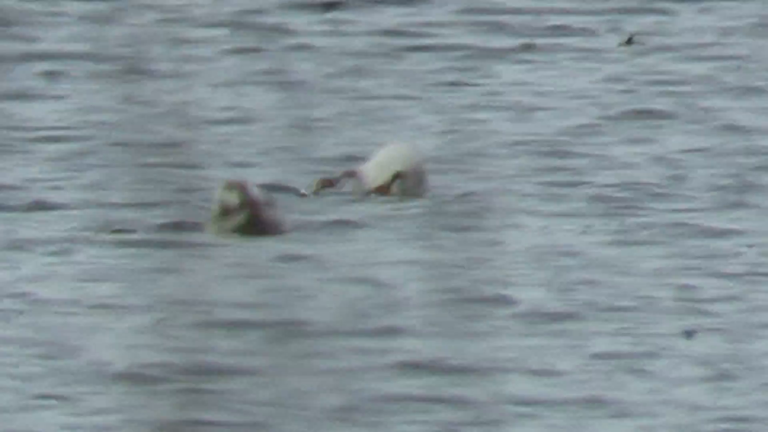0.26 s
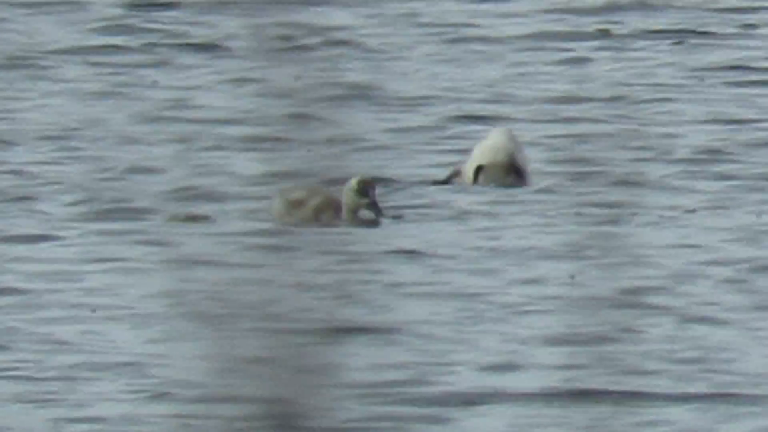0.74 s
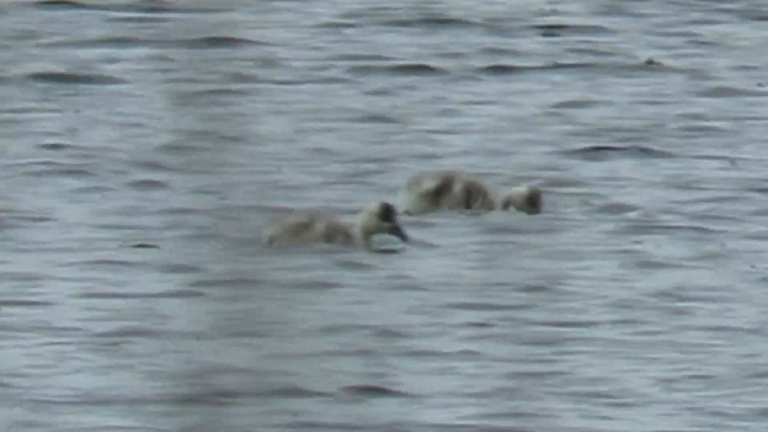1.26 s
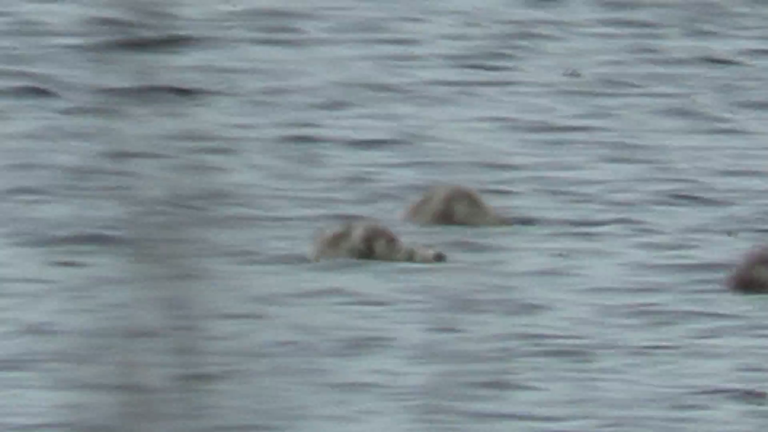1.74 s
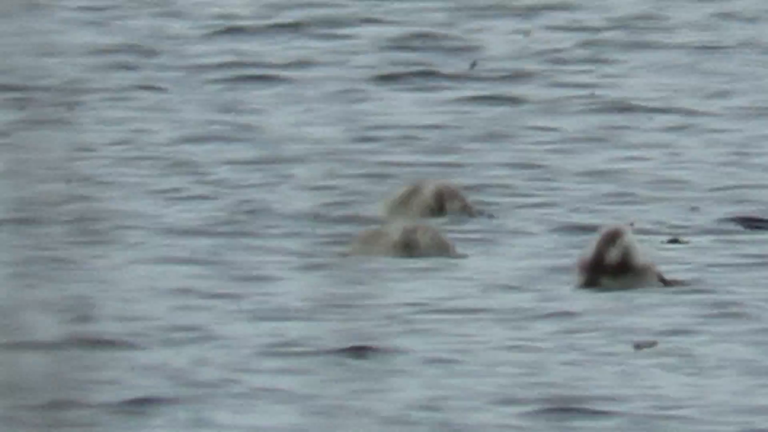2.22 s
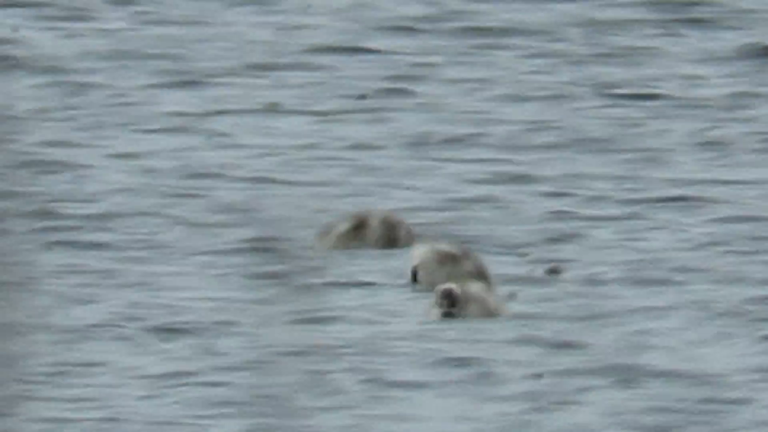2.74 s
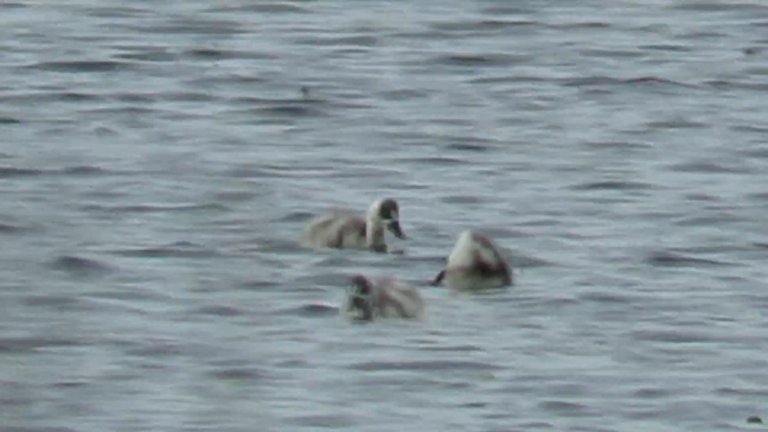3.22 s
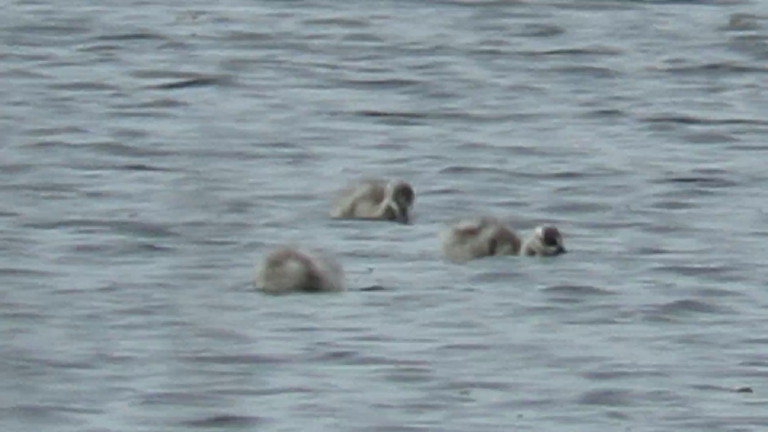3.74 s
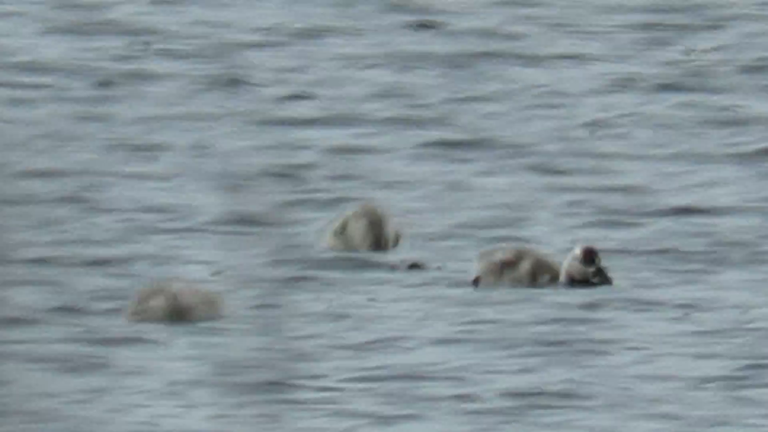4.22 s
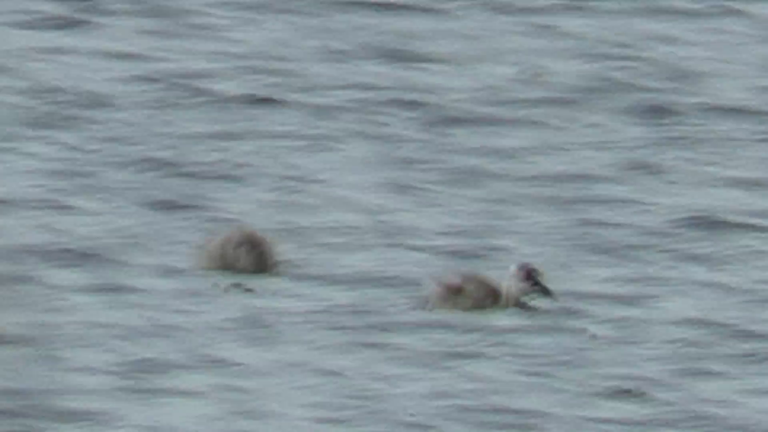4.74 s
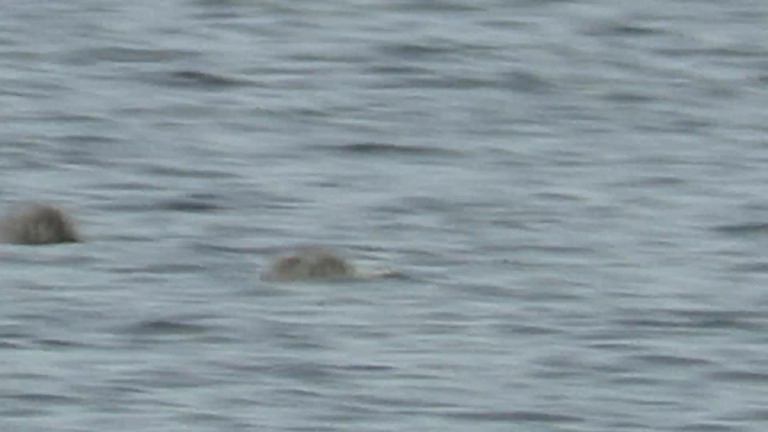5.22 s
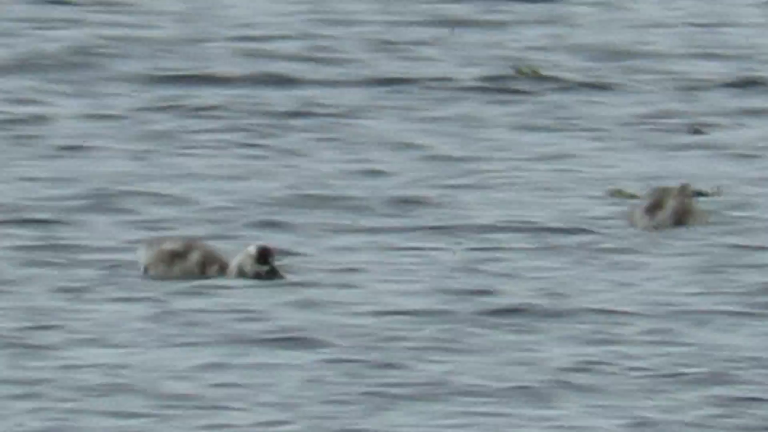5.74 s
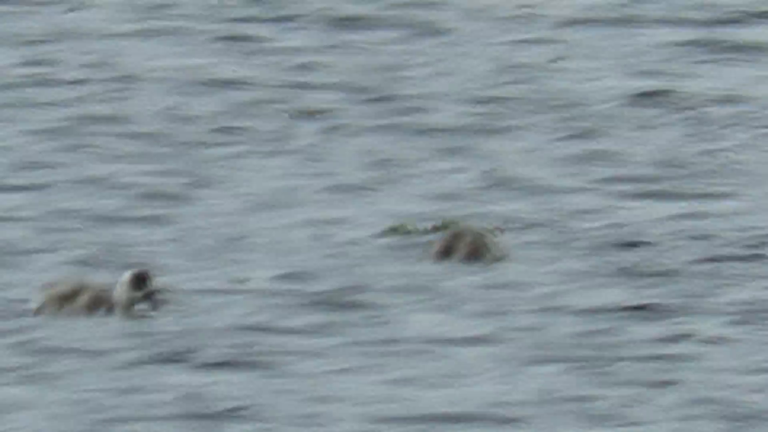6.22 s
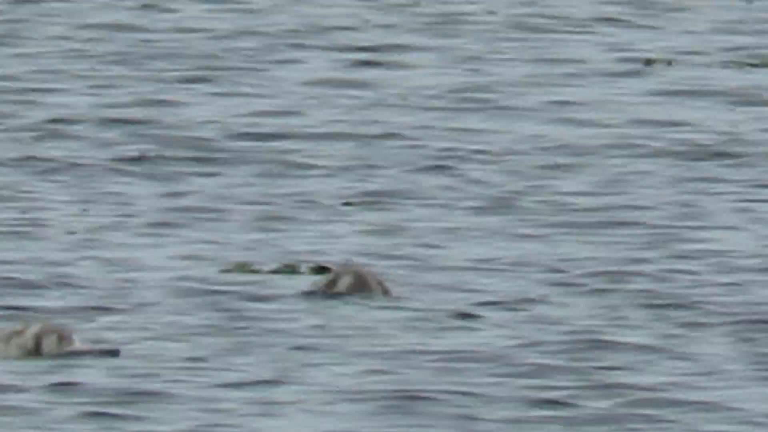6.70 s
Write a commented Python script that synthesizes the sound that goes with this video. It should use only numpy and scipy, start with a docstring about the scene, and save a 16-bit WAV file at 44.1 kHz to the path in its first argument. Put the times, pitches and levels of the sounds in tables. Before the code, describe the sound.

A swan calls a rapid run of short, nasal repeated notes across open water, echoing faintly, while wind rumbles on the microphone.

```python
"""A swan calls a long run of short clear notes across open water: steady partials weighted by the throat, plus breath.
Reeds smear each note, the far shore returns it, and a cove scatters what the beak throws sideways (random taps).
Small birds peep and other fowl hoot far off (arching tones); the camera body knocks and ticks (brief rings).
Wind rumbles on a two-port microphone over the wash of the lake (shaped noise), with two faint narrow bands
in the background, perhaps a microphone resonance and a motor hum (narrow noise)."""
import sys
import numpy as np
from scipy import signal
from scipy.fft import rfft, irfft
from scipy.io import wavfile
from scipy.ndimage import uniform_filter1d

SR = 44100
rng = np.random.default_rng(int(sys.argv[2]) if len(sys.argv) > 2 else 0)


def transcribe(signal):
    """Save signal, clipped to [-1, 1], as a 16-bit WAV file at the path in sys.argv[1]."""
    frames = np.atleast_2d(signal).T
    limited = np.clip(frames, -1, 1)
    pcm = np.round(limited * 32767).astype(np.int16)
    wavfile.write(sys.argv[1], SR, pcm)


N = 307377  # samples in the scene


def gain_of(db):
    """Decibels to an amplitude factor."""
    return 10 ** (np.asarray(db) / 20)


def evened(x):
    """Scales a sound to rms 1."""
    return x / np.sqrt(np.mean(x ** 2) + 1e-20)


def read(points, hz, column=1):
    """Joins one column of a spectrum table on a log-frequency axis."""
    table = np.transpose(points)
    return np.interp(np.log(hz + 1), np.log(table[0] + 1), table[column])


def add(mix, start_s, sound):
    """Lays a sound into the mix, cut off at the end of the mix."""
    part = mix[round(start_s * SR):][:len(sound)]
    part += sound[:len(part)]


def drift(count, size):
    """Slow chance of rms 1, noise smoothed twice over size samples."""
    smooth = uniform_filter1d(rng.standard_normal(count), size=size)
    return evened(uniform_filter1d(smooth, size=size))


def tilt(table, hz):
    """Half the lead and balance of a port table, to multiply the left and divide the right."""
    half_balance = gain_of(read(table, hz, column=3) / 2)
    half_lead = np.exp(.5j * read(table, hz, column=2))
    return half_balance * half_lead


def ports(x, table):
    """A sound from one direction reaches the two ports with its own lead and balance."""
    half = tilt(table, np.fft.rfftfreq(N, 1 / SR))
    return irfft(rfft(x) * np.array([half, 1 / half]), N)


def noise(colour_db, table, patchy_db, size=2048):
    """Random short-time spectra with drifting patches, partly shared by the ports; rms 1."""
    frames, hz = N * 4 // size + 5, np.fft.rfftfreq(size, 1 / SR)
    a, b, c, d, patches = rng.standard_normal((frames, len(hz), 5)).T
    patches = uniform_filter1d(patches, size=14, axis=0)  # across frequency
    patches = evened(uniform_filter1d(patches, size=8, axis=1))  # across time
    likeness = np.clip(read(table, hz), 0, 1)[:, None]
    half = tilt(table, hz)[:, None]
    left = a + 1j * b
    right = likeness * left + np.sqrt(1 - likeness ** 2) * (c + 1j * d)
    spectra = np.array([left * half, right / half])
    spectra *= gain_of(colour_db(hz)[:, None] + patchy_db * patches)
    return evened(signal.istft(spectra, nperseg=size, noverlap=size * 3 // 4)[1][:, :N])


# The two ports for sound through air: pitch_hz, likeness_0_to_1, left_lead_rad, left_minus_right_db
AIR_PORTS = [(60, 1, -1.5, -1), (134, 1, -0.5, 0), (297, 1, -0.2, 0.5), (464, 0.52, 0.1, -1.5),
             (780, 0.52, -0.28, 0.5), (1110, 0.83, 0.2, 0), (1610, 0.38, 0, 0.9), (2160, 0.56, 1.5, 2.5),
             (3590, 0, 2.18, 1.5), (4300, 0.34, 4.5, 0), (4380, 0.24, 3, 0.5), (8240, 0.14, 2.5, 0),
             (13300, 0.9, 4.5, 0)]
# Faint narrow bands in the background: centre_hz, width_hz, level_db
FAINT_BANDS = [(794.8, 19, -55.5), (1036, 8.7, -61)]


def faint_bands():
    """Two narrow bands of noise, perhaps a microphone resonance and a motor hum."""
    out = np.zeros((2, N))
    for centre_hz, width_hz, level_db in FAINT_BANDS:
        band = lambda hz: -20 * np.log10(1 + ((hz - centre_hz) / (width_hz / 2)) ** 2)
        out += gain_of(level_db) * noise(band, AIR_PORTS, patchy_db=1.0, size=4096)
    return out


# Colour of the lake's wash: pitch_hz, density_db (per Hz, relative)
WASH_COLOUR = [(25, -44), (50, -6), (80, 2), (130, -2.5), (200, -4.5), (300, -4), (500, -8), (800, -8.5),
               (1060, -11.5), (1370, -16.5), (2100, -23.5), (2900, -27), (9300, -42), (11500, -47.5),
               (14100, -62.5)]
WASH_DB = -42


def lake():
    """Wide wash of wavelets and air."""
    return gain_of(WASH_DB) * noise(lambda hz: read(WASH_COLOUR, hz), AIR_PORTS, patchy_db=1.55)


# Strength of the wind over time: time_s, rumble_db
GUST_LEVELS = [(0.0, -54), (0.13, -48.5), (0.7, -58.5), (0.85, -42.5), (0.99, -67), (1.01, -54.5),
               (1.5, -65), (1.9, -55), (2.17, -44.5), (2.25, -51.5), (2.75, -42), (2.87, -44), (3.8, -41),
               (3.82, -36), (3.92, -43), (4.15, -36), (4.45, -38.5), (4.56, -46), (5.07, -42.5),
               (5.15, -51), (5.2, -36.5), (5.27, -43.5), (5.38, -41), (5.61, -46.5), (6.27, -43.5),
               (6.37, -39.5), (6.46, -44), (6.72, -40.5), (6.89, -31), (6.97, -41)]
# Colour of the rumble: pitch_hz, density_db (per Hz, relative)
RUMBLE_COLOUR = [(22, -27), (35, -6.5), (50, -2), (72, 3), (110, -2.5), (160, -3.5), (250, -11.5),
                 (420, -18), (600, -42), (1200, -110)]
# Colour of the deeper thump: pitch_hz, density_db (per Hz, relative)
THUMP_COLOUR = [(12, -55), (26, -16), (35, 20), (50, 22), (70, -46), (140, -110)]
# Gusts sweeping across the ports: pitch_hz, likeness_0_to_1, left_lead_rad, left_minus_right_db
GUST_PORTS = [(30, 0.8, -0.5, -1), (48, 0.85, 0.5, 7), (66, 0.92, -.5, -0.5), (98.6, 0.77, -0.24, 5.5),
              (132, 0, -2, -7), (170, 0, -3.5, 2), (222, 0.65, -2.5, -9), (450, 1, -2, -1.5)]
LUMPS_DB, THUMP_LUMPS_DB = 1, 7.5  # chance lumps in rumble and thump
THUMP_DB, THUMP_SHARE = -61, 0.76  # the thump follows the gusts in part


def wind():
    """Gusts on the ports: a lumpy rumble and a deeper thump."""
    gust_db = np.interp(np.arange(N) / SR, *np.transpose(GUST_LEVELS))
    rumble = noise(lambda hz: read(RUMBLE_COLOUR, hz), GUST_PORTS, patchy_db=0.0, size=4096)
    thump = noise(lambda hz: read(THUMP_COLOUR, hz), GUST_PORTS, patchy_db=0.5, size=4096)
    rumble_db = gust_db + LUMPS_DB * drift(N, size=2500)
    thump_db = THUMP_DB + THUMP_SHARE * (gust_db - gust_db.mean()) + THUMP_LUMPS_DB * drift(N, size=2500)
    return gain_of(rumble_db) * rumble + gain_of(thump_db) * thump


# Low rings of the camera body: pitch_hz, level_db
BODY_RINGS = [(450, -16), (730, -2), (1100, -14), (1520, -2)]
# High rings of the camera shell: pitch_hz, level_db
SHELL_RINGS = [(2200, -12), (2750, -12), (3300, -4), (4050, -1), (5150, -9), (5900, -9), (6500, 0),
               (7060, 2), (8530, -5), (9120, -9), (9950, -21), (13000, -26)]
GRIT_SHARE = .35  # noise in the crack, against the rings of the shell
KNOCK_LEAD = 200  # samples before the peak


def knock(ring_db, ring_ms, crack_db, crack_ms, crack_hz, octaves):
    """A brief touch: the body rings for a few cycles under a short crack of the shell."""
    t = np.arange(-KNOCK_LEAD, 312) / SR
    away_ms = t * 1000 / np.where(t > 0, 1.2, 1)  # dies slower than it rises
    ring = sum(gain_of(db) * np.sin(2 * np.pi * hz * t) for hz, db in BODY_RINGS)
    hz, db = np.transpose(SHELL_RINGS)
    struck = gain_of(db) * np.exp(-.5 * (np.log2(hz / crack_hz) / octaves) ** 2)
    phases = rng.random((len(hz), 1))
    crack = evened(struck @ np.sin(2 * np.pi * (hz[:, None] * t + phases)))
    octaves_off = np.log2(np.fft.rfftfreq(len(t), 1 / SR) / crack_hz + 1e-9)
    band = np.exp(-.5 * (octaves_off / min(octaves, .6)) ** 2)
    grit = evened(irfft(band * rfft(rng.standard_normal(len(t)))))
    crack = evened(crack + GRIT_SHARE * grit)
    return (gain_of(ring_db) * np.exp(-.5 * (away_ms / ring_ms) ** 2) * ring
            + gain_of(crack_db) * np.exp(-.5 * (away_ms / crack_ms) ** 2) * crack)


# Knocks and ticks: peak_s, ring_db, ring_width_ms, crack_db, crack_width_ms, crack_centre_hz, crack_spread_octaves
TOUCHES = [(2.483, -24.5, 1.0, -45, .9, 3000, .7), (4.9942, -62, 1.1, -34.5, 1.0, 6000, 2.5),
           (1.0412, -72, .8, -50, .6, 5500, .25), (1.1142, -72, .8, -53, .6, 5500, .25)]
# Ports for sound through the body: pitch_hz, likeness_0_to_1 (unused), left_lead_rad, left_minus_right_db
BODY_PORTS = [(300, 1, .2, 0), (1200, 1, .5, 0), (2300, 1, .8, 0), (4100, 1, 2.0, 1.5), (7500, 1, 1.6, 1),
              (13000, 1, 2.0, 0)]


def camera_body():
    """Touches travel through the solid body to both ports."""
    camera = np.zeros(N)
    for peak_s, *blow in TOUCHES:
        add(camera, peak_s - KNOCK_LEAD / SR, knock(*blow))
    return ports(camera, BODY_PORTS)


HOARSE_SHARE = .3  # how much a far call throbs


def whistle(length_s, start_hz, top_hz, end_hz, level_db):
    """One soft tone whose pitch arches through three points."""
    u = np.linspace(-1, 1, round(length_s * SR))
    hz = top_hz + u * (end_hz - start_hz) / 2 + u ** 2 * ((start_hz + end_hz) / 2 - top_hz)
    throb = 1 + HOARSE_SHARE * drift(len(u), size=150)
    tone = np.sin(2 * np.pi * np.cumsum(hz) / SR) * signal.windows.tukey(len(u), .7)
    return np.sqrt(2) * gain_of(level_db) * throb * tone


# Peeps of small birds: start_s, length_s, start_hz, top_hz, end_hz, level_db
BIRD_PEEPS = [(.037, .04, 2900, 3100, 2650, -58), (.195, .04, 2020, 1940, 1880, -59.5),
              (.69, .042, 2900, 3230, 2950, -58), (4.835, .063, 2980, 3170, 3050, -59),
              (5.25, .04, 3100, 3880, 3700, -58)]
# Hoots of far fowl: start_s, length_s, start_hz, top_hz, end_hz, level_db
FOWL_HOOTS = [(1.14, .05, 690, 670, 650, -50), (5.165, .035, 790, 810, 800, -47),
              (5.255, .04, 800, 810, 800, -52), (6.045, .05, 1240, 1200, 1160, -52),
              (6.025, .065, 1030, 1050, 1020, -51), (6.085, .07, 1370, 1330, 1310, -46.5),
              (6.135, .04, 1400, 1400, 1350, -50), (6.092, .068, 800, 780, 810, -45),
              (6.515, .06, 820, 790, 780, -51)]


def other_birds():
    """Peeps and hoots reach the ports through the air as simple tones."""
    others = np.zeros(N)
    for start_s, *shape in BIRD_PEEPS + FOWL_HOOTS:
        add(others, start_s, whistle(*shape))
    return ports(others, AIR_PORTS)


TAP_GAP = 40  # samples; one random tap in each gap


def scatter(table, first, returns=()):
    """Sparse taps of random sign from sample first on, plus single returns, coloured band by band."""
    taps = np.zeros((2, SR))
    slots = np.arange(first, SR - TAP_GAP, TAP_GAP)
    at = slots + rng.integers(0, TAP_GAP, (2, len(slots)))
    np.put_along_axis(taps, at, rng.choice([-1., 1.], at.shape), 1)
    taps[1] = 0.74 * taps[0] + 0.93 * taps[1]  # the ports share part of the scatter
    banks = np.zeros(SR)
    for delay_s, db in returns:
        banks[round(delay_s * SR)] = gain_of(db)
    hz, t, tail = signal.stft(taps, SR, nperseg=256)
    t60 = read(table, hz, column=2)[:, None]
    # the root sets each band's energy alike for any decay time
    tail = tail * gain_of(-60 * t / t60) * np.sqrt(np.log(1e6) * TAP_GAP / SR / t60)
    paths = (tail + signal.stft(banks, SR, nperseg=256)[2]) * gain_of(read(table, hz))[:, None]
    return signal.istft(paths, SR, nperseg=256)[1]


# Near scatter in the reeds: pitch_hz, level_db, t60_s
NEAR_REEDS = [(700, -8, 0.14), (1600, -9.5, 0.17), (2400, -18, 0.14), (3200, -15, 0.12), (4200, -6, 0.06),
              (5500, -12.5, 0.071)]
# Return of the far shore: pitch_hz, level_db, t60_s
FAR_SHORE = [(600, -10.5, 0.74), (830, -7.5, 0.59), (1470, -8, 1), (1640, -12, 1), (2500, -17, 0.62),
             (3000, -12, 0.53), (4020, -5.5, 0.55), (5500, -17, .4)]
# Single returns of the banks: delay_s, level_db (against the shore colour)
BANK_ECHOES = [(.028, -7.5), (.055, -6), (.092, -6.5), (.19, -21)]
# Diffuse return of what the beak throws sideways: pitch_hz, level_db, t60_s
COVE_RETURN = [(3000, -11, .28), (4000, -11, .28)]


def shore(x, thrown):
    """Near reeds smear each note and far banks return it; the cove scatters what the beak throws sideways."""
    paths = scatter(NEAR_REEDS, 130) + scatter(FAR_SHORE, 900, BANK_ECHOES)
    cove = scatter(COVE_RETURN, 700)
    returned = signal.fftconvolve(x, paths, axes=1) + signal.fftconvolve(thrown, cove, axes=1)
    return returned[:, :N]


# Windpipe and beak, colouring breath and partials: pitch_hz, level_db
WINDPIPE = [(620, -16), (690, -1.5), (740, -1), (800, -1), (900, 4), (1250, -4), (1480, -2), (1720, 1),
            (2000, -2.5), (2350, 1.5), (2800, -2), (3120, -6.5), (3480, -8.5), (3900, -11.5), (4250, -19.5),
            (5000, -18.5), (6200, -28), (8000, -78)]


def breath(count):
    """Air rushing through the windpipe, gradually thinned below about 2500 Hz, near the third partial."""
    hz = np.fft.rfftfreq(count, 1 / SR)
    thinning = (hz / 2500) ** 2 / (1 + (hz / 2500) ** 2)
    return evened(irfft(rfft(rng.standard_normal(count)) * gain_of(read(WINDPIPE, hz)) * thinning, count))


# Partials 1-8 until the pitch breaks downward, in full for far-falling notes: level_db
OPENING_PARTIALS = [-5, 4, 0, 3, 1.5, 1, -9, 0]
# Own levels of partials 5-8: level_db
UPPER_PARTIALS = [-2.5, -1, -0.5, -7]
UPPER_SHARE, UPPER_HOLD = 0.83, 0.28  # partials 5-8 share brightness; 6-8 escape part of the fade
FAR_FALL_HZ = 160  # a fall this large counts as far
ATTACK_S, ATTACK_DB, TIED_ATTACK_DB = 0.006, -21, -10  # a tied note starts already sounding
RELEASE_S, RELEASE_DB = 0.0079, -11.5
BREAK_S, FULL_BREAK = .0035, .25  # quick drop after the top; share of the fall that catches fully
CATCH_DB, CATCH_S, CATCH_GROWTH = -5, 0.0028, 0.36  # the voice catches at the break, more so in higher partials
SWELL_DB_PER_HZ = 0.13  # effort grows with the pitch on the way up
LIFT_HZ_PER_S = 2740  # a larger lift starts earlier
FADE_BEND = 0.82  # bends the fade against the sag
FOURTH_FADE_DB = -6.5  # the fourth partial thins as a far-falling note sags
BREATH_DB, PUFF_DB = -20, 16  # breath against effort; its swell as a far-falling note lets go
RASP_DB, RASP_GROWTH = -24, .5  # breath noise on each partial; growth with partial number
WOBBLE = 0.0035  # pitch unsteadiness as a share
FLUTTER_DB = .6  # first partial's level unsteadiness, as air over the water bends the path


def note(length_s, top_s, onset_hz, top_hz, low_hz, snap, bend, effort_db, fade_db,
         first_db, second_db, fourth_db, bright_db, tied, hoarse_db,
         fifth_db, sixth_db, seventh_db, third_db, lift_hz, thrown_db):
    """Steady membrane partials, each weighted by the throat at its own frequency."""
    t = np.arange(0, length_s, 1 / SR)
    ramp = lambda start_s, span_s: np.clip((t - start_s) / span_s, 0, 1)

    # pitch: rise to the top, quick break, sag, lift on letting go
    rise = np.sin(np.pi / 2 * ramp(ATTACK_S, max(top_s - ATTACK_S, 1 / SR)))
    below_top_hz = (top_hz - onset_hz) * (1 - rise)
    lift_s = RELEASE_S + max(lift_hz - 12, 0) / LIFT_HZ_PER_S
    sag = ramp(top_s, max(length_s - lift_s - top_s, .004)) ** bend
    fall = snap * ramp(top_s, BREAK_S) + (1 - snap) * sag
    hz = top_hz - below_top_hz - (top_hz - low_hz) * fall + lift_hz * ramp(length_s - lift_s, lift_s)
    hz = uniform_filter1d(hz, size=80) * (1 + WOBBLE * drift(len(t), size=100))
    turns = 2 * np.pi * np.cumsum(hz) / SR

    # effort: swell in, follow the pitch, fade and let go
    far = min(1, (top_hz - low_hz) / FAR_FALL_HZ) ** 2
    fade = fade_db * sag ** FADE_BEND
    attack = (TIED_ATTACK_DB if tied else ATTACK_DB) * (1 - ramp(0, ATTACK_S))
    release = RELEASE_DB * ramp(length_s - RELEASE_S, RELEASE_S)
    effort = effort_db + attack - SWELL_DB_PER_HZ * below_top_hz + fade + release
    catch_depth_db = CATCH_DB * min(1, snap / FULL_BREAK) ** 2
    catch = catch_depth_db * np.exp(-((t - top_s - BREAK_S / 2) / CATCH_S) ** 2)

    # balance of the partials
    opening = far * (1 - ramp(top_s, BREAK_S / 2))
    third = third_db * (1 - ramp(top_s, BREAK_S))
    fourth = fourth_db + FOURTH_FADE_DB * far * fall
    upper = [own_db + run_db + UPPER_SHARE * bright_db - (k > 5) * UPPER_HOLD * fade
             for k, (own_db, run_db) in enumerate(zip(UPPER_PARTIALS, [fifth_db, sixth_db, seventh_db, 0]), start=5)]

    puff = PUFF_DB * far * ramp(length_s - 2 * RELEASE_S, RELEASE_S)
    out = gain_of(BREATH_DB + hoarse_db / 2 + puff) * breath(len(t))
    for k, shift in enumerate([first_db, second_db, third, fourth, *upper], start=1):
        level = read(WINDPIPE, k * hz) + shift + OPENING_PARTIALS[k - 1] * opening
        level += FLUTTER_DB * np.sqrt(k) * drift(len(t), size=250) + catch * k ** CATCH_GROWTH
        rasp = gain_of(RASP_DB + hoarse_db) * k ** RASP_GROWTH * drift(len(t), size=40)
        out += gain_of(level) * (np.sin(k * turns) + rasp * np.cos(k * turns))
    thrown = gain_of(thrown_db) * opening * rise ** 2 * np.sin(4 * turns)
    return np.sqrt(2) * gain_of(effort) * np.array([out, thrown]) * signal.windows.tukey(len(t), .1)


# Swan notes: start_s, length_s, time_to_top_s, onset_hz, top_hz, low_hz, break_share_0_to_1 (of the fall),
# sag_bend (1 = straight), effort_db, fade_db, fundamental_db, second_db, fourth_db, brightness_db
SWAN_NOTES = [(0.817, 0.043, 0.01, 840, 867, 794, 0.12, 1.03, -35.5, -3, -2.5, -1, -6, -9),
              (0.906, 0.038, 0.015, 813, 838, 770, 0.03, 1.6, -41.5, -3, 2, 6.5, -2, -2),
              (0.994, 0.037, 0.023, 802, 834, 770, 0.07, 1.4, -41.5, -1.5, 3, 8, -1.5, 0),
              (1.087, 0.046, 0.02, 710, 811, 753, 0.1, 1.4, -41, -5, 1.5, 5.5, -1.5, -10),
              (1.216, 0.056, 0.023, 710, 820, 784, 0.02, 1.9, -41.5, -5.5, 0, 7, -3.5, -20),
              (1.374, 0.058, 0.034, 723, 812, 753, 0.02, 1.6, -44.5, -0.5, 4, 9.5, -1, -8),
              (1.527, 0.056, 0.023, 753, 837, 756, 0.12, 2.4, -46, 0.5, 5.5, 9, 0, -10),
              (1.677, 0.063, 0.022, 787, 845, 745, 0.29, 1.2, -41, -3.5, 2, 2, -7, -11),
              (1.827, 0.066, 0.0202, 783, 853, 720, .25, 1.4, -36.5, -4.5, -2.5, -6.5, -9, -16),
              (2.003, 0.077, 0.019, 812, 857, 681, 0.29, 1.3, -41.5, -4.5, 3.5, -3, -2, -13),
              (2.178, 0.071, 0.016, 806, 845, 660, 0.21, 1.27, -40.5, -6, 2.5, -3, -1.5, -10),
              (2.356, 0.071, 0.014, 813, 854, 664, 0.24, 1.1, -38.5, -8.5, 2.5, -3.5, -4, -4),
              (2.538, 0.077, 0.015, 807, 854, 674, 0.31, 1.3, -39.5, -6, 1, -4, 0, 1),
              (2.727, 0.085, 0.017, 810, 859, 675, 0.29, 0.92, -38, -9.5, 1.5, -4, 0.5, 0.5),
              (2.918, 0.093, .014, 815, 862, 670, 0.27, 0.85, -35.5, -9, -0.5, -5, -3, -2),
              (3.125, 0.1, 0.013, 816, 860, 665, 0.22, 0.82, -34.5, -10, -1, -5.5, -5, -12),
              (3.355, 0.074, 0.0132, 831, 868, 687, 0.31, 0.9, -37, -8, 1.5, -4.5, -4, -1),
              (3.422, 0.057, 0.029, 699, 709, 673, 0.06, 2.6, -53.5, -8, 0, 4, 6, 14),
              (3.602, 0.09, 0.015, 825, 852, 656, 0.24, 0.96, -36.5, -11.5, 0.5, -8, -3.5, 7),
              (3.675, 0.12, 0.03, 673, 713, 643, 0, 5.6, -47, -14, -5.5, -0.5, 3, 3.5),
              (3.964, 0.07, 0.0098, 829, 827, 641, 0.17, 1.55, -35.5, -9, -1.5, -11, -5, 0),
              (4.062, 0.072, 0.0207, 667, 763, 644, 0.28, 1.6, -40.5, -8, -3.5, -7, -5.5, 1),
              (4.122, 0.064, 0.017, 682, 704, 616, 0.06, 3, -49.5, -5, -3, -16, 1.5, 8),
              (4.403, 0.073, 0.013, 808, 808, 637, .24, 1.62, -41, -11, 1.5, -4, -3.5, 5),
              (4.506, 0.069, 0.021, 667, 753, 630, 0.43, 1.37, -44.5, -11, 4.5, -2, -0.5, 3),
              (4.589, 0.081, 0.0316, 679, 725, 614, 0.01, 1.9, -47.5, -13, 0, -3, 1.5, -1),
              (4.89, 0.066, 0.014, 797, 814, 645, 0.22, 1.6, -37, -13, -1.5, -8, -3.5, 2.5),
              (5, 0.057, 0.021, 672, 740, 628, 0.18, 0.95, -43, -6, 1, -4, -2, 4),
              (5.096, 0.048, 0.035, 669, 693, 650, .02, 2.1, -52, -1, 0, -12, -5, -2),
              (5.388, 0.066, 0.014, 837, 840, 664, 0.11, 1.44, -39.5, -7, -1, -8, -5, 0),
              (5.498, 0.057, 0.014, 705, 749, 640, 0.28, 1.16, -44.5, -11, 3, -2, 1.5, -4),
              (5.612, 0.048, 0.018, 675, 736, 675, .27, 0.97, -51, -4, -11, -3, -5, -12),
              (5.969, 0.065, 0.013, 808, 870, 663, 0.15, 2.2, -38.5, -13, -6, -5.5, -5, 0),
              (6.081, 0.057, 0.015, 739, 782, 677, 0.05, 2.3, -44.5, -4, 0.5, -2, -0.5, 0),
              (6.198, 0.05, 0.016, 720, 736, 615, 0.06, 1.23, -47, -9, 4, -10, 1, -8),
              (6.628, 0.057, 0.015, 740, 799, 693, 0, 3, -41, -6, -1.5, -8.5, -1, -8),
              (6.754, 0.048, 0.015, 740, 780, 680, 0.01, 4.1, -44.5, -0.5, -1.5, -5, -0.5, -2),
              (6.867, 0.056, 0.008, 746, 732, 664, .15, 0.98, -51, 1, 4, -7, -2, -19)]
# The voice along the run: time_s, fifth_db, sixth_db, seventh_db, third_db (before the break),
# lift_hz (as the note lets go), thrown_db (the fourth partial's opening, sideways)
VOICE_RUN = [(.8, -2, 0.5, -2, 0, 8, -25), (1.5, -3, 4, -4, 2.5, 8, -20), (1.68, 2, -2, -6, -5, 9.2, -4),
             (1.83, 0, -4, -6, -8, 10, -4), (2.0, 0, 0, -4, -1, 9.1, 5), (2.2, 0, -2, -4, 0.5, 13, 3),
             (2.55, -1, -2, -6, 0.5, 13.5, 5), (2.7, 2, -2, -2, 1, 20, -1), (2.92, 4, -2, -2.5, 0, 39, 4),
             (3.13, 8, 0, -3, 0.5, 45, -1), (3.35, 1, 1, -.5, 0.5, 15, -1), (3.42, -2, 5, -2, -1, 13.5, -3),
             (3.6, -5, -1, 0, -1, 12, 2), (3.68, -1, 4, -5, -1, 13, 2), (3.96, -4, -1, -6, -2, 13, 1),
             (4.12, -2, -4, -6, 0, 12, 1), (4.4, -1, -3, -10, 0.5, 12, 0), (5.0, 2, -1, 0, -2.5, 13, -2),
             (5.4, 2, -2, -3, 1, 12, -5), (5.97, 3, -8, -8, 2, 12, -10), (6.08, -3, 4, -8, 1, 10, -20),
             (6.2, 0, 0, -10, 1, 10, -25), (6.63, 2, 4, -10, -1, 10, -25), (6.76, 0, 0, -10, 0, 10, -25),
             (6.9, 0, -2, -10, -2, 10, -25)]
# Hoarseness along the run: time_s, rasp_db (added to the rasp, half of it to the breath)
HOARSE_RUN = [(.8, -5), (1.4, -4), (1.7, 5), (2.05, 4), (2.4, 0), (3.3, -2), (4.0, 2), (4.6, 3), (5.6, 2),
              (5.9, -5), (6.9, -5)]
# Ports for the swan's direction: pitch_hz, likeness_0_to_1 (unused), left_lead_rad, left_minus_right_db
SWAN_PORTS = [(700, 1, .3, 0), (1350, 1, .15, .5), (1650, 1, .4, 1), (1950, 1, 1.3, 2.5),
              (2300, 1, 1.65, 3), (3150, 1, 1.8, 2.5), (3450, 1, 2.1, 2), (3750, 1, 2.9, 0),
              (4050, 1, 2.6, 1), (4350, 1, 2.15, 2), (5600, 1, 2.1, 1.5)]


def swan():
    """The run of notes as heard directly and as thrown sideways, both at the ports."""
    heard, thrown = np.zeros((2, N))
    quiet_from_s = 0
    run_s, *columns = np.transpose(VOICE_RUN)
    for start_s, *shape in SWAN_NOTES:
        tied = start_s < quiet_from_s  # the note before is still sounding
        hoarse_db = np.interp(start_s, *np.transpose(HOARSE_RUN))
        voice = [np.interp(start_s, run_s, column) for column in columns]
        call, cast = note(*shape, tied, hoarse_db, *voice)
        add(heard, start_s, call)
        add(thrown, start_s, cast)
        quiet_from_s = start_s + shape[0]
    return ports(heard, SWAN_PORTS), ports(thrown, SWAN_PORTS)


def scene():
    """Faint bands, lake, wind, camera body and other birds under the swan and its returns."""
    heard, thrown = swan()
    background = faint_bands() + lake() + wind() + camera_body() + other_birds()
    return background + shore(heard, thrown) + heard


def record(dry):
    """The band limit of the recorder: a steep low-pass."""
    edge_hz = 14200
    low_pass = signal.firwin(511, edge_hz, window=("kaiser", 9), fs=SR)
    return signal.oaconvolve(dry, low_pass[None], "same")


dry = scene()
out = record(dry)
transcribe(out)
```